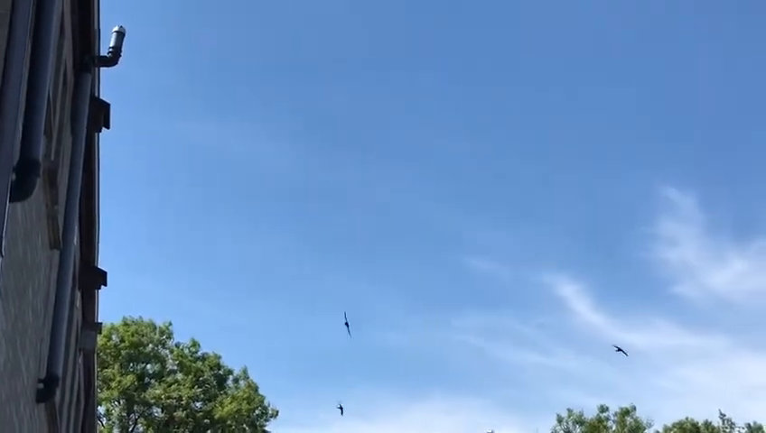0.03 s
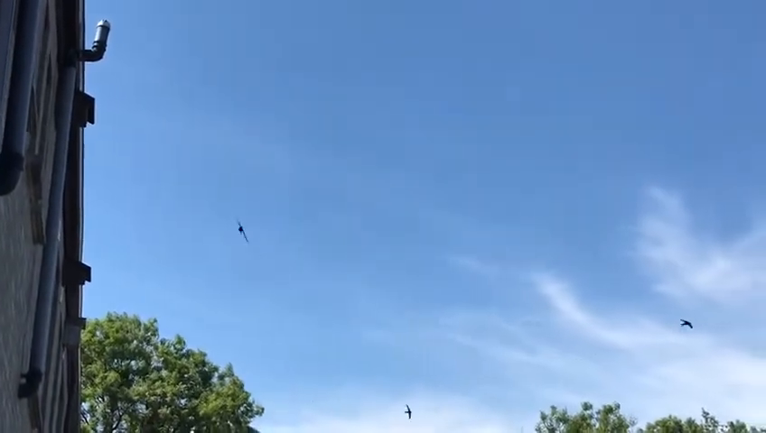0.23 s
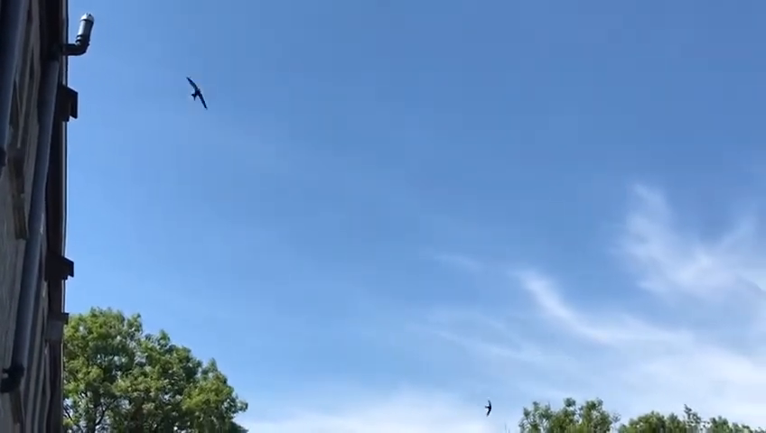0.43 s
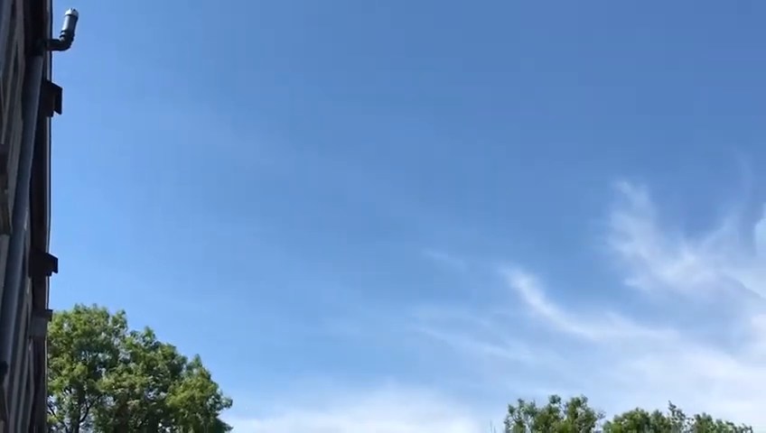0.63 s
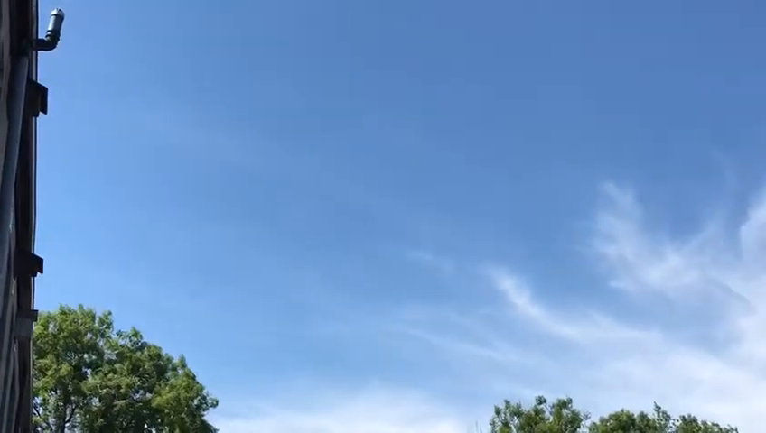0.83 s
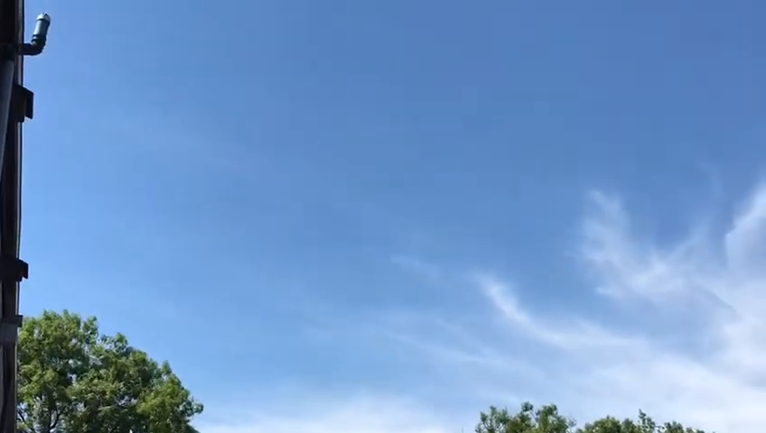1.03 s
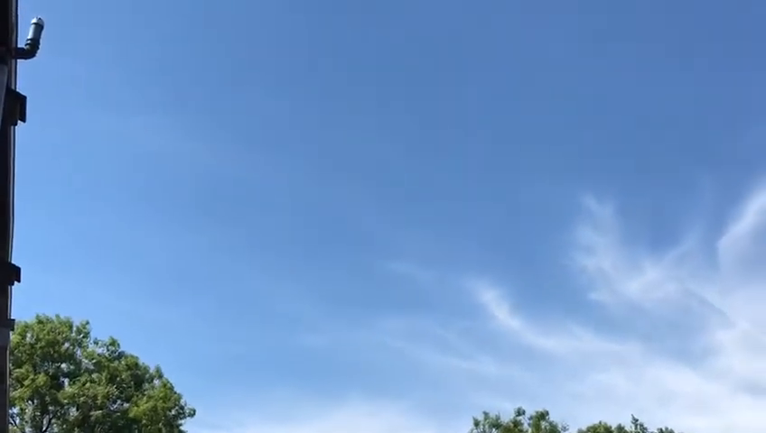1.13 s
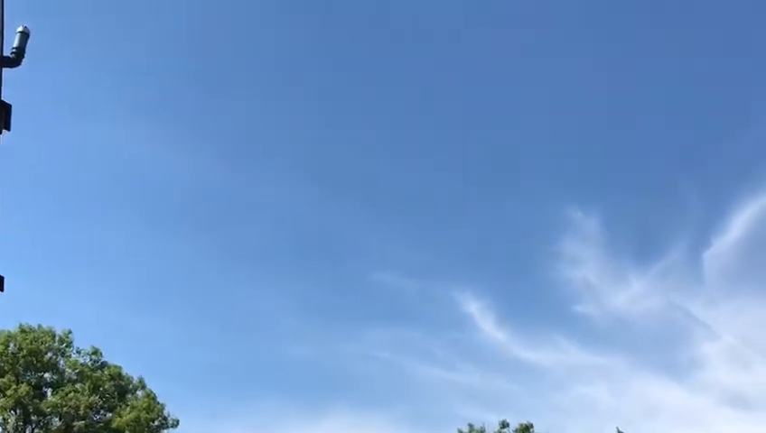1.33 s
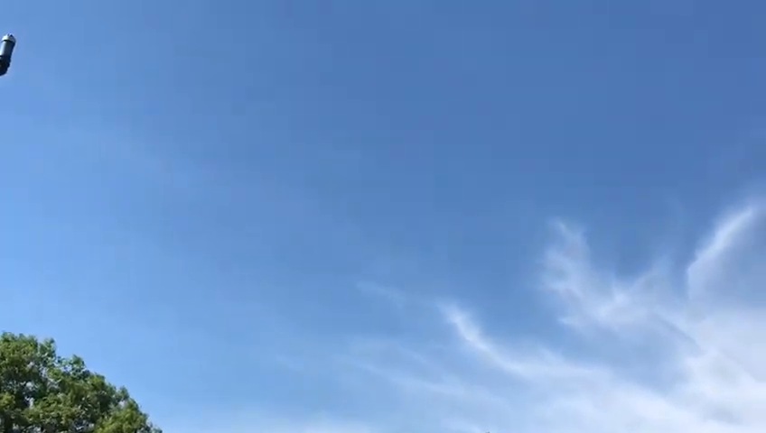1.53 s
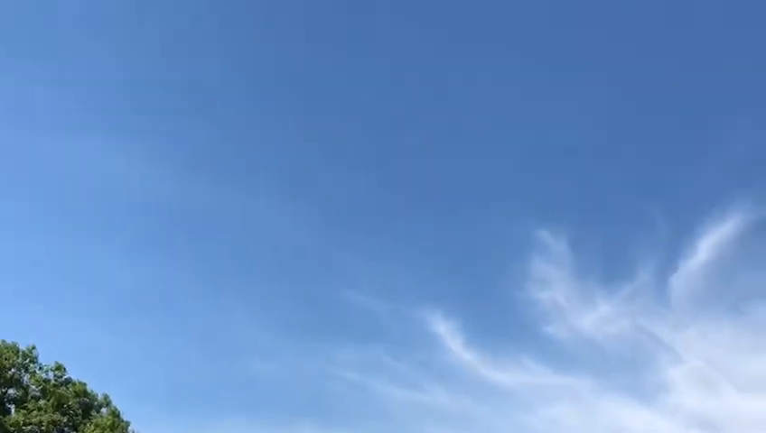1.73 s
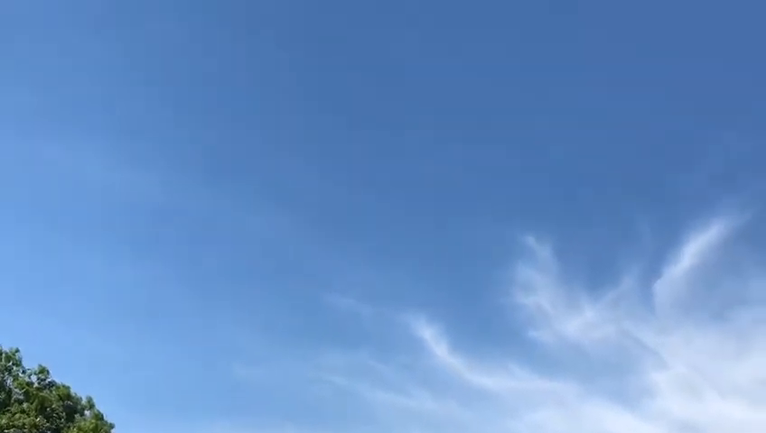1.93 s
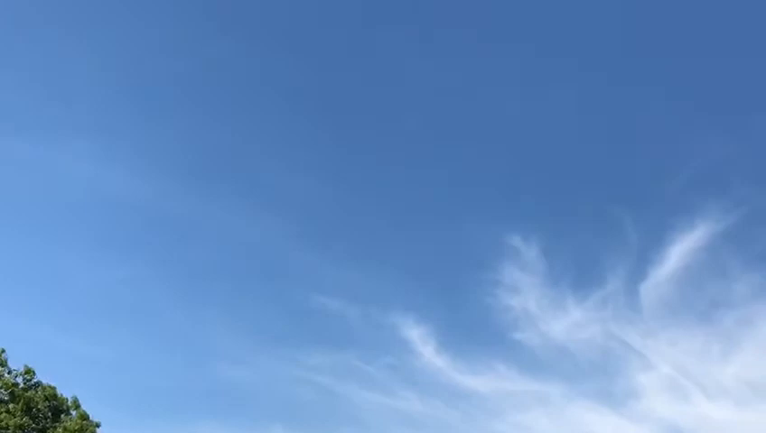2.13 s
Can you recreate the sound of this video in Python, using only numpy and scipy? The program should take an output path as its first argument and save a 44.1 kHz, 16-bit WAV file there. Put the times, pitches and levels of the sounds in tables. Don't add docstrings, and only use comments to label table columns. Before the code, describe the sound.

Shrill, buzzing swift screams pile up in a quick burst beside a house, ending in a loud rapid trill. Wind rumbles and slaps the bare microphone midway, and afterwards only wind and soft distant hum remain.

```python
import sys
import numpy as np
from scipy import signal
from scipy.fft import rfft, irfft, next_fast_len
from scipy.io import wavfile
from scipy.ndimage import uniform_filter1d, map_coordinates

SR = 44100
rng = np.random.default_rng(int(sys.argv[2]) if len(sys.argv) > 2 else 0)


def unload_audio(sound):
    columns = np.transpose(np.atleast_2d(sound))
    steps = np.round(np.clip(columns, -1, 1) * 32767)
    wavfile.write(sys.argv[1], SR, steps.astype(np.int16))


def voltage_ratio(decibels):
    exponent = np.asarray(decibels, float) / 20
    return 10 ** exponent


N = 97020

# freq_hz, density_db_per_hz
TOWN_SPECTRUM = [(150, -33), (250, -2), (410, -6.5), (927, -10.5), (2000, -19), (5830, -23.5),
                 (10500, -32.5), (12500, -21), (14800, -43), (22000, -120)]
TOWN_DB = -64.5

# time_s, level_db
WIND_STRENGTH = [(0, -48), (.2, -47), (.25, -31.5), (.32, -48), (.43, -37), (.5, -44.5), (.6, -39.5),
                 (.74, -44), (.81, -31.5), (.93, -41), (1.12, -43), (1.4, -47.5), (1.6, -45.5), (1.95, -49),
                 (2.07, -39.5), (2.14, -47.5), (2.17, -43), (2.2, -31.5)]
# freq_hz, density_db_per_hz
RUMBLE_SPECTRUM = [(12, -64), (30, -22), (39, -3.5), (60, 1.5), (116, -7), (362, -37), (400, -29),
                   (520, -64), (880, -120)]
# freq_hz, density_db_per_hz
FLUTTER_SPECTRUM = [(59, -39), (100, 1.5), (286, -8.5), (598, -28), (808, -50), (1200, -67), (1560, -85),
                    (2640, -120)]
# time_s, level_db
GUST_FLUTTER = [
    (.755, -52),
    (.775, -35),
    (.84, -33.5),
    (.895, -35.5),
    (.92, -63),
]
# center_s, level_db, width_s (negative = reversed push)
MEMBRANE_SLAPS = [(0.7755, -22, .001), (.781, -24.5, .001), (0.7882, -25.5, .0012), (0.798, -17.5, .0022),
                  (0.811, -11.5, .00095), (0.8166, -30.5, .0005), (.8195, -21.5, .001),
                  (0.8358, -21, .0025), (0.846, -27.5, .0015), (0.8713, -30.5, -.0005),
                  (0.8739, -16.5, .0013), (0.8928, -20, -.0011)]
FLUTTER_DB, FLUTTER_DB_PER_WIND_DB = -22.5, 1.6
MIC_LOW_HZ, MIC_TOP_HZ = 41, 11420

# freq_hz, t60_s
YARD_DECAY = [(4000, 0.79), (6000, 1), (9000, 0.45)]
WALL_DELAY_S, WALL_DB = 0.011, -21
YARD_DB, EARLIER_DB, EARLIER_HZ = -21, -59, 6200

# time_s, pitch_hz, level_db, buzz_hz, harshness, half_rate_share
FIRST_BIRD = [(.162, 4416, -55.5, 238, 0.81, 0.12), (.184, 5364, -40, 243, 0.43, .1),
              (.196, 5414, -37.5, 244, 0.14, 0.078), (.222, 5550, -40, 251, 0.33, .1),
              (.262, 5463, -37.5, 243, 0.26, .1), (.282, 5505, -43.5, 236, 0.66, 0.11),
              (.34, 5360, -40, 239, 0.51, 0.082), (.4, 5330, -46, 244, 0.7, .1)]
SECOND_BIRD = [(.262, 4280, -50, 233, 0.24, .1), (.274, 4830, -42.5, 227.5, 0.22, .1),
               (0.289, 5094, -36, 242.6, 0.32, .1), (0.312, 4934, -39, 238.6, 0.38, .1),
               (.342, 5245, -36, 264, 0.42, .1), (.372, 5700, -31.5, 253, 0.17, .1),
               (0.417, 5764, -33, 251.2, 0.39, .2), (0.435, 5876, -37, 256.2, 1.06, 0.26),
               (0.612, 5890, -45, 249.6, 1.16, 0.27)]
THIRD_BIRD = [(.54, 4193, -54.5, 247, 0.27, 0.12), (0.551, 4700, -41, 253, 0.26, 0.11),
              (.566, 4987, -41.5, 249, 0.29, 0.12), (.6, 5140, -36.5, 249.5, 0.12, 0.087),
              (0.639, 5080, -37, 240, 0.37, .1), (0.699, 5018, -39.5, 229.5, 0.22, 0.12),
              (0.702, 5060, -54.5, 225, 0.44, 0.11), (0.713, 5140, -39, 222, 0.61, 0.14),
              (0.73, 5050, -41.5, 224, 0.87, 0.11)]
FOURTH_BIRD = [(.565, 5290, -41, 248, 0.33, 0.099), (.604, 5749, -37, 261, 0.3, 0.098),
               (0.628, 6000, -41, 262.7, 0.48, 0.09), (.66, 6250, -39.5, 248.3, 1.08, 0.18),
               (0.692, 6270, -40.5, 246, 0.55, .2), (.74, 6445, -38.5, 250, 0.35, 0.38),
               (.8, 6555, -43.5, 240.7, 0.24, 0.35), (0.854, 6370, -50.5, 250, 1.7, 0.3)]
FOURTH_BIRD_LOWER = [(.65, 5946, -59, 241.6, .7, 0.35), (.7, 6020, -44, 244, 0.66, 0.27),
                     (.74, 6103, -45.5, 245.5, 1, 0.43), (.79, 6060, -40.5, 236.6, 0.92, 0.34),
                     (.85, 6180, -45, 230, 0.98, .3)]
SCREAMS = [FIRST_BIRD, SECOND_BIRD, THIRD_BIRD, FOURTH_BIRD, FOURTH_BIRD_LOWER]
# swing_per_harshness, swing_phase_rad, double_db, three_halves_db, half_db, hiss_db
SCREAM_VOICES = [(0.58, -0.39, -15, -72, -79, -46), (0.83, -1.27, -12.5, -39, -63, -19.5),
                 (0.93, -0.37, -19.5, -28, -31, -28), (0.38, -1.3, -35, -48, -53, -13.5),
                 (0.33, -0.6, -46, -50, -66, -42)]

# start_s, level_db, pitch_hz
TRILL_NOTES = [
    [(.0004, -36, 6110), (.0169, -34.5, 6060), (.0324, -39, 6050), (.0503, -40, 5690), (.067, -57, 4980)],
    [(.410, -34, 5600), (.422, -35, 5400), (.4474, -42, 5030), (.4604, -44.5, 4710), (.4754, -47, 4340),
     (.4894, -49, 4200)],
    [(.613, -30, 5510), (.641, -27, 5860), (.671, -29, 5750), (.681, -42, 5800), (.701, -38, 5580),
     (.71, -42, 5770), (.733, -37, 5280)],
    [(.731, -42.5, 4883), (.753, -37.5, 5270), (.776, -34, 5470), (.800, -32.5, 5490), (.828, -37.5, 5350),
     (.855, -43, 5140)],
    [(.857, -42, 6640), (.867, -31, 6200), (.883, -30, 6180), (.899, -29.5, 6200), (.915, -29.5, 6200),
     (.931, -33, 5960), (.949, -30.5, 5750), (.966, -42.5, 5260)],
]
# note_length_s, harshness, double_db, three_halves_db, half_db
TRILL_VOICES = [(0.0051, 0.1, -19.5, -48, -37), (0.007, 0.6, -11, -53, -54), (0.0066, 0.22, -9, -23, -40),
                (0.014, 0.17, -10, -28, -36.5), (0.0069, 0.19, -22, -29.5, -39.5)]
NOTE_RISE_S, NOTE_SAG, NOTE_HISS_DB = .0008, .008, -22

# freq_hz, density_db_per_hz
HISS_SPECTRUM = [(3500, -21), (6500, 4.5), (8600, -9.5), (11000, -10), (12200, -31)]
BUZZ_JITTER, PITCH_WAVER, RASP, SECOND_FLAP = .03, .009, .08, .2
OVERTONE_LOSS_DB = 6
OVERTONE_PULSE, PULSE_LAG_RAD = 0.3, -0.82


def unit(x):
    return x / np.sqrt(np.mean(x ** 2) + 1e-20)


def along(points, hz):
    f, v = np.transpose(points)
    return np.interp(np.log(hz + 1), np.log(f + 1), v)


def curve(points, t, **ends):
    return np.interp(t, *np.transpose(points), **ends)


def wobble(rate_hz, size=N):
    knots = rng.standard_normal(int(size * rate_hz / SR) + 4)
    return map_coordinates(knots, [np.arange(size) * rate_hz / SR])


def noise(spectrum, size=N):
    m = next_fast_len(size + 8192)
    gain = voltage_ratio(along(spectrum, np.fft.rfftfreq(m, 1 / SR)))
    return unit(irfft(rfft(rng.standard_normal(m)) * gain, m)[:size])


def town():
    return voltage_ratio(TOWN_DB + 0.23 * wobble(4.3)) * noise(TOWN_SPECTRUM)


def membrane_slaps(t):
    out = np.zeros(N)
    for center_s, db, width_s in MEMBRANE_SLAPS:
        u = (t - center_s) / width_s
        out += -2 * voltage_ratio(db) * u / (1 + u ** 2) * np.exp(-(u / 5) ** 2)
    return out


def wind():
    t = np.arange(N) / SR
    wind_db = curve(WIND_STRENGTH, t)
    rumble = voltage_ratio(wind_db) * unit(voltage_ratio(2.6 * wobble(14.14)) * noise(RUMBLE_SPECTRUM))

    mean_db = wind_db.mean()
    breeze = voltage_ratio(mean_db + FLUTTER_DB + FLUTTER_DB_PER_WIND_DB * (wind_db - mean_db))
    gust = voltage_ratio(curve(GUST_FLUTTER, t, left=-120, right=-120))
    flutter = (breeze + gust) * unit(voltage_ratio(4.3 * wobble(39.66)) * noise(FLUTTER_SPECTRUM))

    ratio = (np.fft.rfftfreq(2 * N, 1 / SR) / MIC_LOW_HZ) ** 4
    low_cut = ratio / (1 + ratio)
    return rumble + irfft(rfft(flutter + membrane_slaps(t), 2 * N) * low_cut)[:N]


def yard(birds):
    hz, t, z = signal.stft(rng.standard_normal((2, SR)), SR, nperseg=256)
    z = z * voltage_ratio(-60 * t / along(YARD_DECAY, hz)[:, None])
    z[1] *= np.exp(-.5 * ((hz - EARLIER_HZ) / 400) ** 2)[:, None]
    tail, earlier = signal.istft(z, SR, nperseg=256)[1]

    diffuse = signal.fftconvolve(np.pad(birds, (1200, 0)), tail / np.linalg.norm(tail))[:N]
    diffuse[:len(earlier)] += voltage_ratio(EARLIER_DB - YARD_DB) * earlier / np.std(earlier[:2000])
    wall = np.pad(birds, (round(WALL_DELAY_S * SR), 0))[:N]
    return voltage_ratio(WALL_DB) * wall + voltage_ratio(YARD_DB) * diffuse


def whistle(hz, buzz_hz, harsh, half, effort, swing, lag_rad, double_db, three_halves_db, half_db, hiss_db):
    n = len(hz)
    flap_hz = buzz_hz * (1 + BUZZ_JITTER * wobble(58.6, size=n))
    flap = 2 * np.pi * np.cumsum(flap_hz) / SR + rng.uniform(0, 2 * np.pi)

    def shake(p):
        slow = half * np.cos(flap / 2 + p / 2 + 1.3)
        return np.cos(flap + p) + slow + SECOND_FLAP * np.cos(2 * flap + 2 * p)

    tone_hz = hz * (1 + PITCH_WAVER * np.sqrt(harsh) * wobble(44.9, size=n))
    phase = 2 * np.pi * np.cumsum(tone_hz) / SR
    phase = phase + harsh * (shake(-np.pi / 2) + RASP * 4 * wobble(500, size=n))

    loudness = np.exp(swing * harsh * shake(lag_rad)) / np.sqrt(np.i0(2 * swing * harsh))
    loudness = loudness * (1 + RASP * wobble(307, size=n))

    chop = 1 + OVERTONE_PULSE * np.cos(flap + PULSE_LAG_RAD) + 0.22 * wobble(302.4, size=n)
    double = voltage_ratio(double_db - OVERTONE_LOSS_DB * harsh) * chop * np.sin(2 * phase)
    three_halves = voltage_ratio(three_halves_db) * np.sin(1.5 * phase + 2 * wobble(500, size=n))
    under = voltage_ratio(half_db) * np.sin(phase / 2)
    hiss = voltage_ratio(hiss_db) * harsh * np.sqrt(harsh) * noise(HISS_SPECTRUM, size=n)
    return loudness * (np.sin(phase) + double + effort * (three_halves + under) + hiss)


def trills():
    out = np.zeros(N)
    for notes, (length_s, harsh, *overtones_db) in zip(TRILL_NOTES, TRILL_VOICES):
        u = np.arange(round(length_s * SR)) / (length_s * SR)
        rise = np.clip(u * length_s / NOTE_RISE_S, 0, 1)
        shape = rise * np.sin(np.pi * (.25 + .75 * u)) ** .9
        for start_s, db, pitch_hz in notes:
            hz = pitch_hz * (1 + NOTE_SAG * (.5 - u))
            note = whistle(hz, 286, harsh, 0, 0.92, 0.67, 0.75, *overtones_db, NOTE_HISS_DB)
            out[round(start_s * SR):][:len(u)] += voltage_ratio(db) * shape * note
    return out


def screams():
    out = np.zeros(N)
    for rows, voice in zip(SCREAMS, SCREAM_VOICES):
        time_s, *columns = np.transpose(rows)
        start = round(time_s[0] * SR)
        t = np.arange(start, round(time_s[-1] * SR)) / SR
        hz, db, buzz_hz, harsh, half = [np.interp(t, time_s, c) for c in columns]
        edge = np.clip(np.minimum(t - t[0], t[-1] - t) / 0.00089, 0, 1)
        effort = voltage_ratio(db - db.max())
        call = whistle(uniform_filter1d(hz, size=300), buzz_hz, harsh, half, effort, *voice)
        out[start:][:len(t)] += np.sqrt(2) * edge * voltage_ratio(db) * call
    return out


def scene():
    birds = screams() + trills()
    return (town() + wind() + yard(birds) + birds)[None]


def roll_off(x):
    return signal.sosfilt(signal.butter(12, 12590, fs=SR, output="sos"), x)


def record(dry):
    fade = 1 / (1 + (np.fft.rfftfreq(2 * N, 1 / SR) / MIC_TOP_HZ) ** 30)
    mix = irfft(rfft(dry, 2 * N) * fade)[:, :N]
    return roll_off(mix)


dry = scene()
out = record(dry)
unload_audio(out)
```